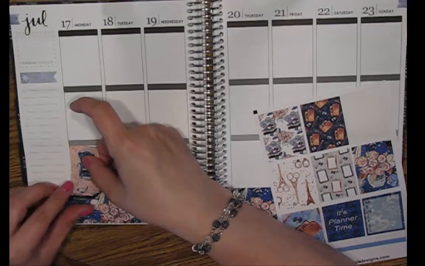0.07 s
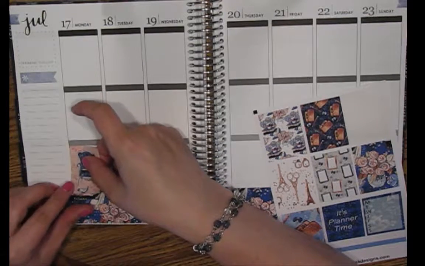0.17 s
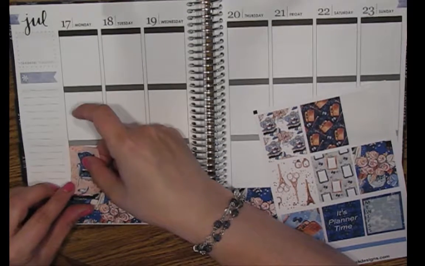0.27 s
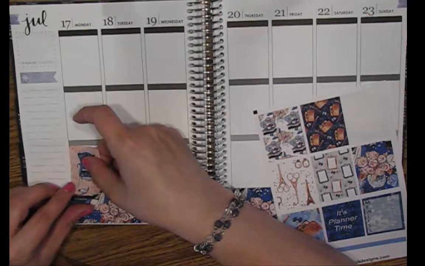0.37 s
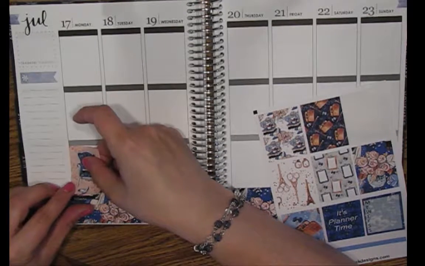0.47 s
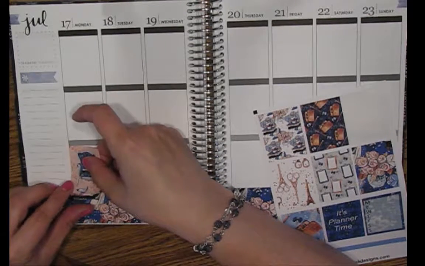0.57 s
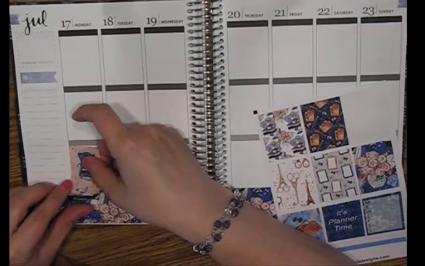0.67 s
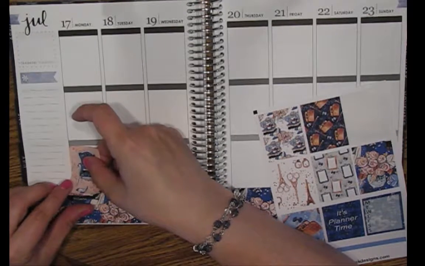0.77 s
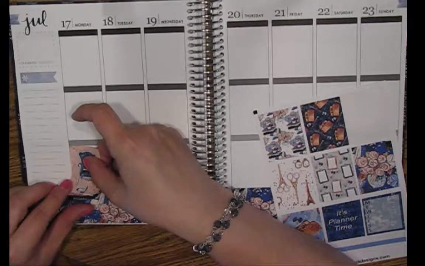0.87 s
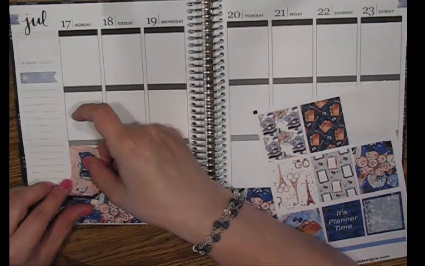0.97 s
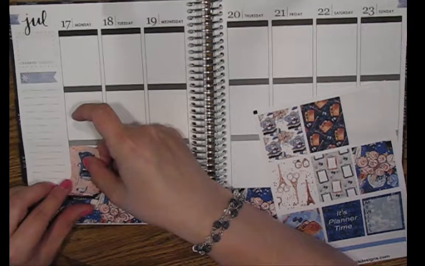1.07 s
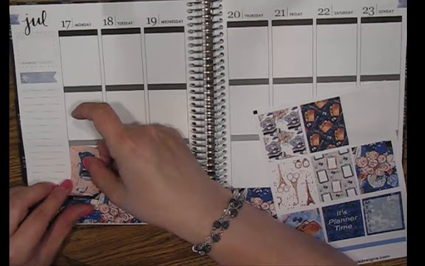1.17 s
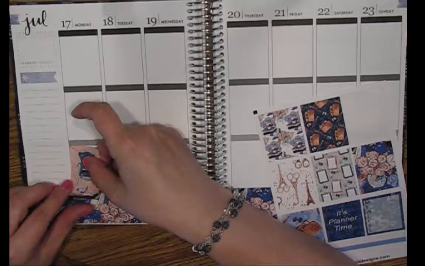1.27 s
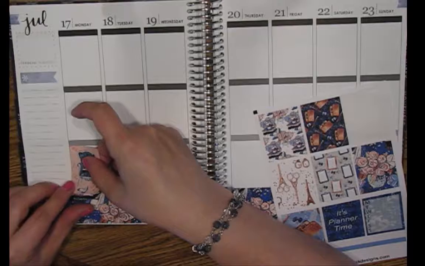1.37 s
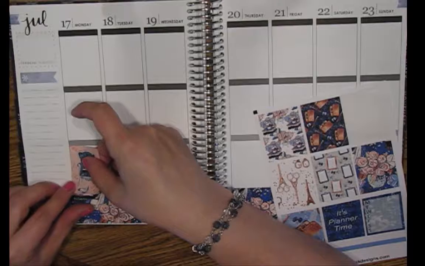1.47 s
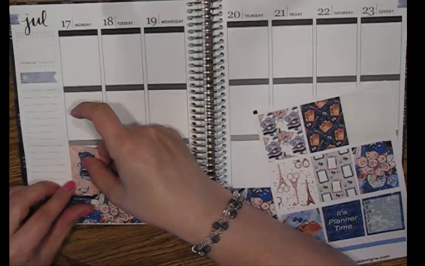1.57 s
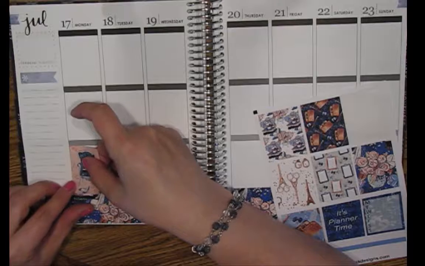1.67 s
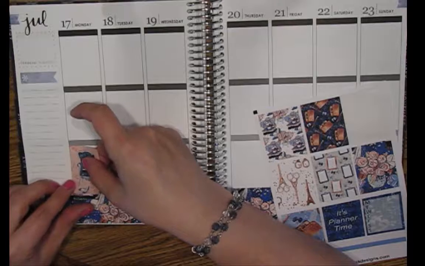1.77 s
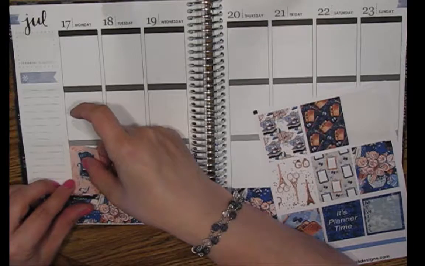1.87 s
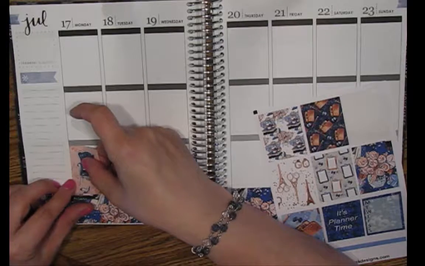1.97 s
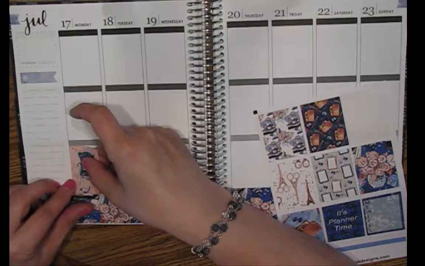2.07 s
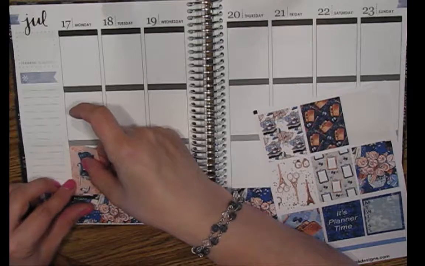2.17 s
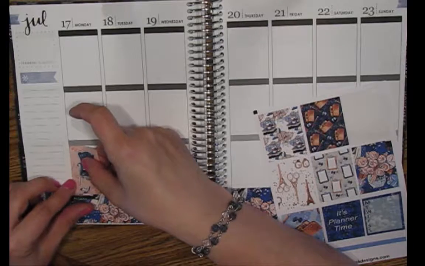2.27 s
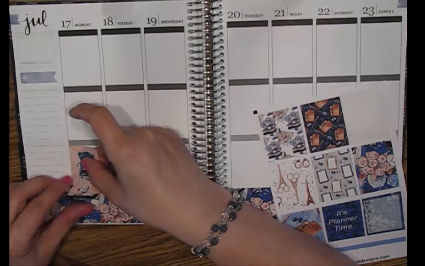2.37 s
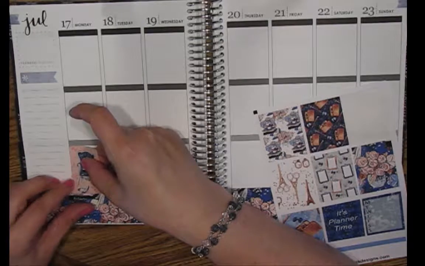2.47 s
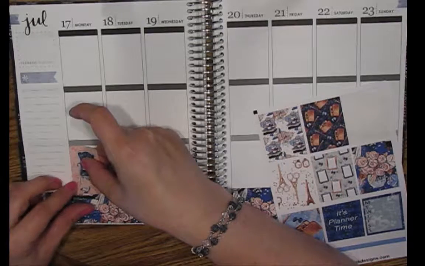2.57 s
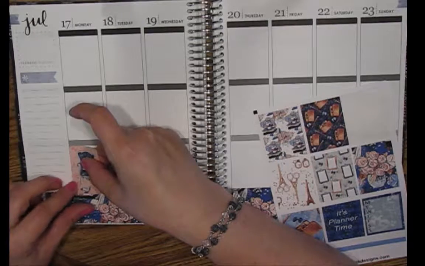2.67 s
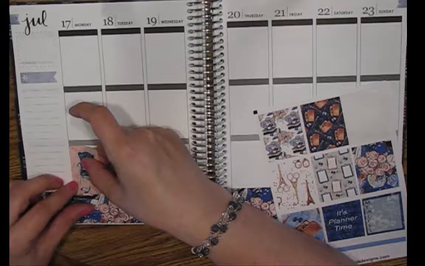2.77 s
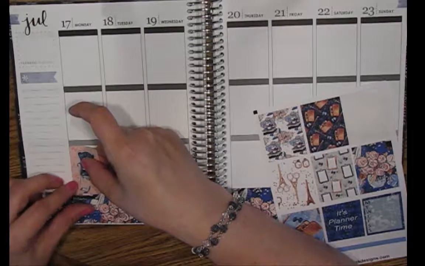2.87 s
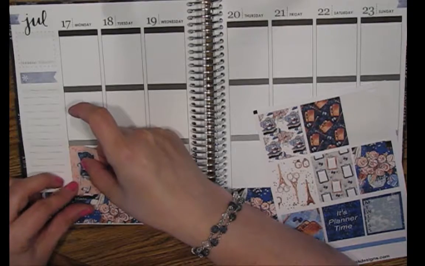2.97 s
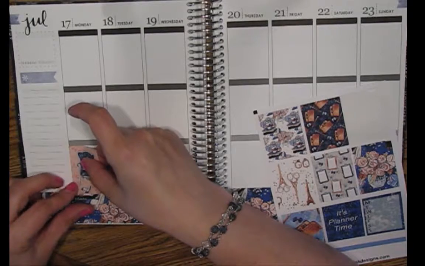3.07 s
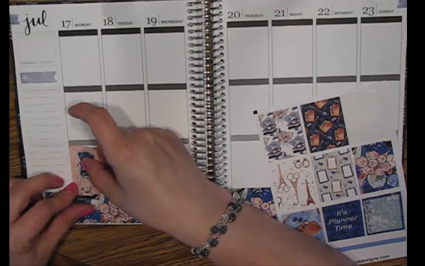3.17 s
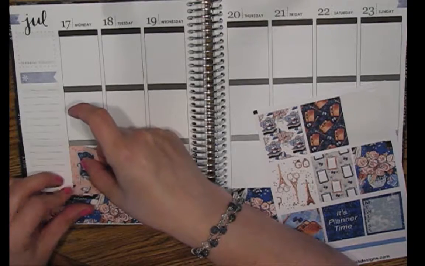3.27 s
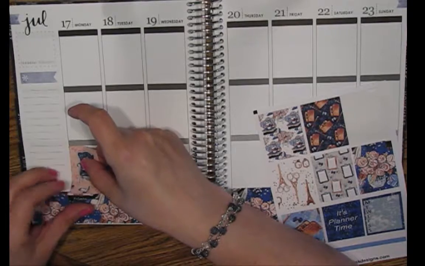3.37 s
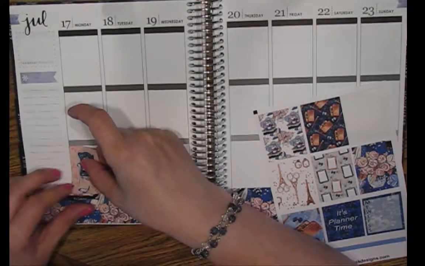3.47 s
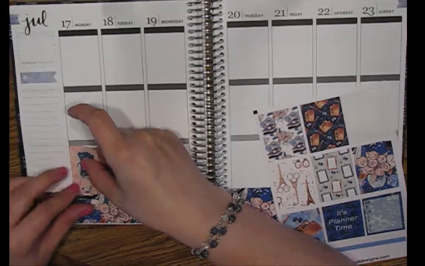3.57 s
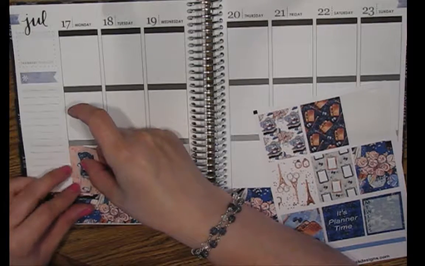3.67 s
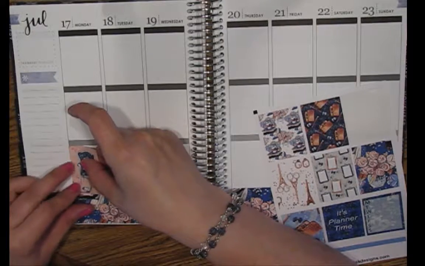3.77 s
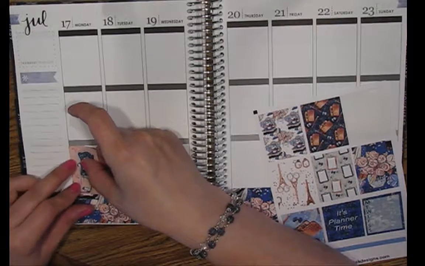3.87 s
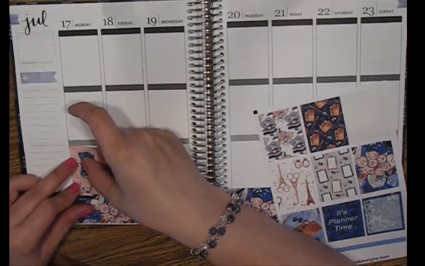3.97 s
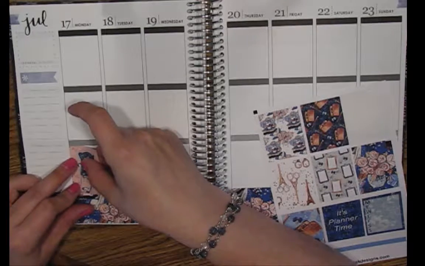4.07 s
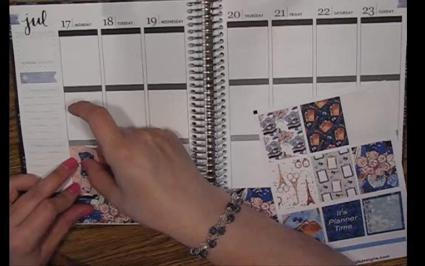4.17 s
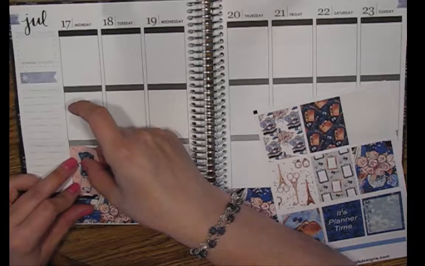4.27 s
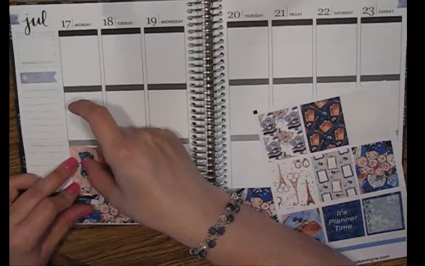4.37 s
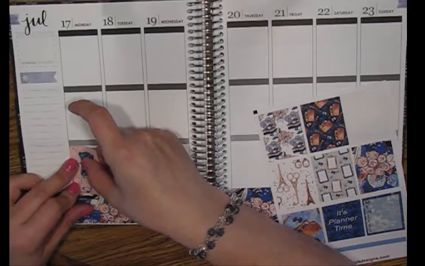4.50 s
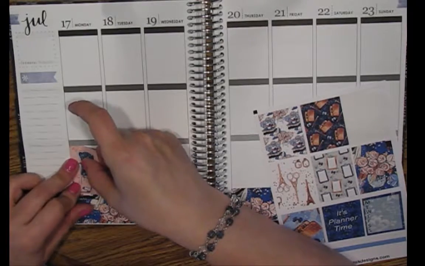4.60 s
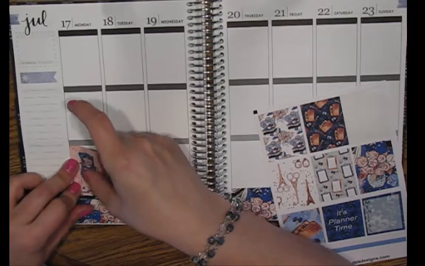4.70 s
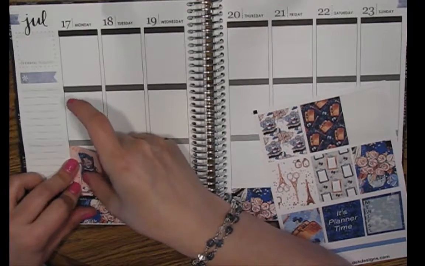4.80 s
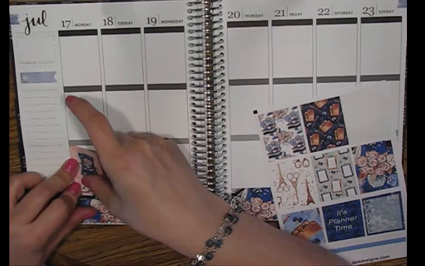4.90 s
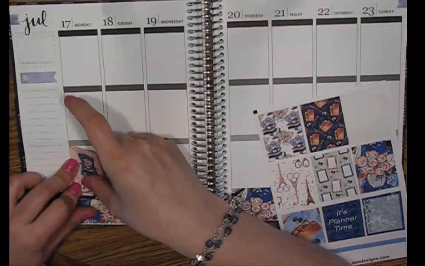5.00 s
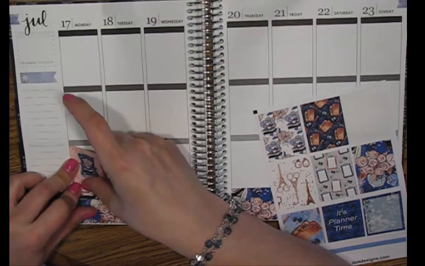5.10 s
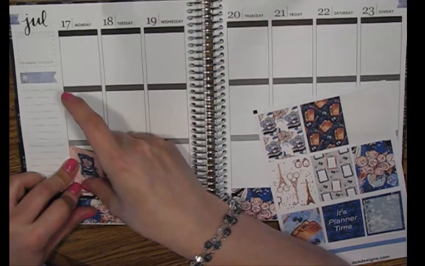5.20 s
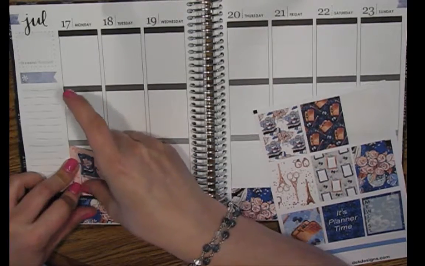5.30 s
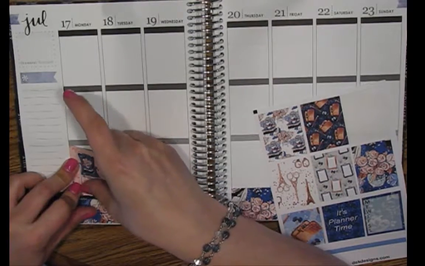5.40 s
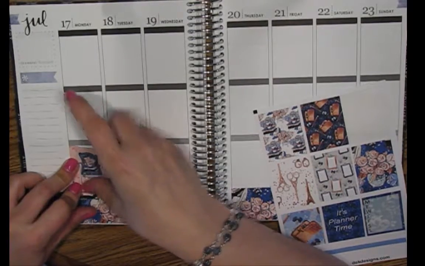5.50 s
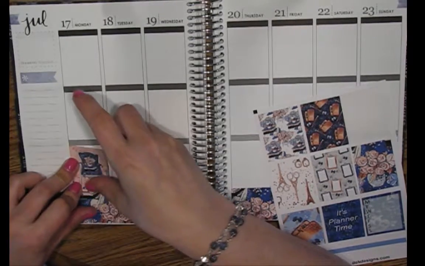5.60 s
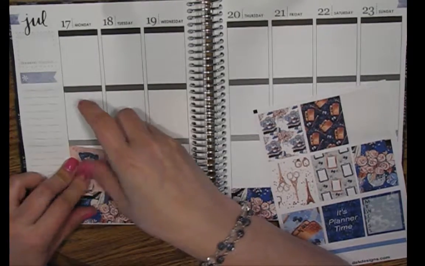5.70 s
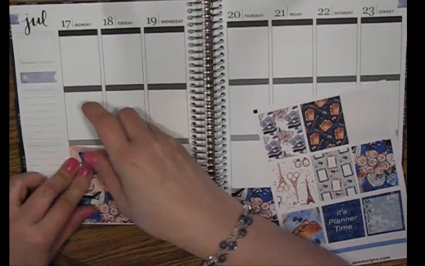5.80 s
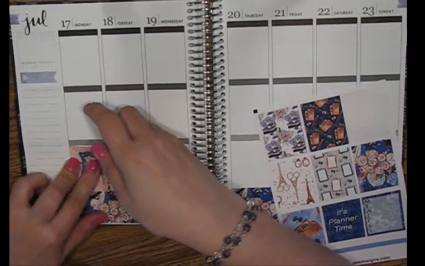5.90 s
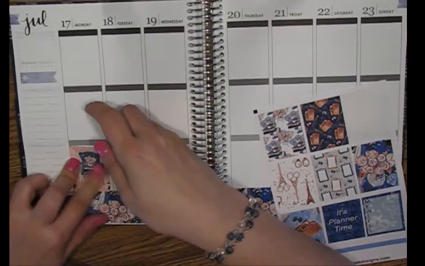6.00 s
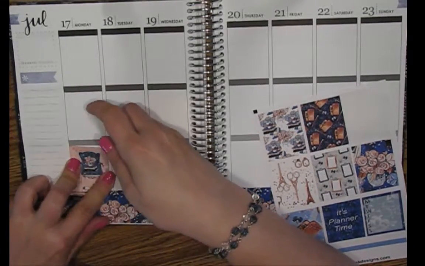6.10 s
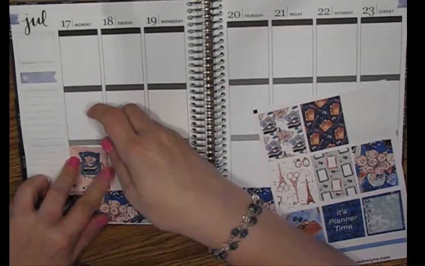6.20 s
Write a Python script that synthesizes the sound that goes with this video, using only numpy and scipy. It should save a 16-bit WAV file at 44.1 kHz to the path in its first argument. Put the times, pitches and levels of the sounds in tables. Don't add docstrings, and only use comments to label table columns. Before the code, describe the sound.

A close, quiet indoor scene over about six seconds. Throughout, a steady low mains motor hum sits under soft air rumble, a faint hollow duct whistle swelling in quick irregular puffs, and thin microphone hiss. A tiny skin scuff opens the sound, then almost nothing but the bed until about 2.5, when light ticks and a soft rub appear, with a sharper glue tick at 2.9. Around 3.5 a small cluster of crisp ticks comes with a short hiss, followed by faint slips near 3.8 and 4.0. From 4.8 fingertips rub more firmly, with sticky ticks and dull nail taps, the strongest at 5.35. At about 5.67 the stiff sheet buckles in one very loud, bright snap, with a small low notebook thud and a short room tail. Rubbing continues with two crisp ticks near 5.86 and more brushing and ticks around 6.2.

```python
import sys
import numpy as np
from scipy import signal
from scipy.fft import rfft, irfft
from scipy.io import wavfile

SR = 44100
rng = np.random.default_rng(int(sys.argv[2]) if len(sys.argv) > 2 else 0)


def volts_from_decibels(level):
    exponent = np.asarray(level, float) / 20
    return 10 ** exponent


def dump(signal):
    limited = np.clip(np.atleast_2d(signal).T, -1, 1)
    pcm = np.round(limited * 32767).astype(np.int16)
    wavfile.write(sys.argv[1], SR, pcm)


N = 275492

# freq_hz, density_db [dB per Hz]
AIR_COLOUR = [(20, -9), (45, -11.5), (75, -6), (95, 1.5), (150, 1.5), (260, 1.5), (300, -8.5), (450, -7.5),
              (800, -14.5), (1000, -14), (1150, -21.5), (2000, -30), (4000, -36), (9000, -50.5)]
# freq_hz, width_hz, level_db [rms]
DUCT_TONES = [(204, 27, -70.5), (349.8, 42, -57), (497.4, 19.3, -57), (609.3, 17, -66.5),
              (669.8, 16, -66.5), (753.5, 37, -67), (1017.7, 21, -68.5)]
# centre_s, peak_db, length_s
PUFFS = [(0.216, -56, 0.054), (0.396, -51.5, 0.055), (0.58, -51.5, 0.05), (0.787, -52.5, 0.071),
         (1.006, -50.5, 0.045), (1.192, -51, 0.051), (1.458, -50, 0.05), (1.707, -52, .1),
         (1.826, -55, .07), (2.038, -62, 0.027), (2.16, -47, 0.011), (2.35, -54.5, 0.11),
         (2.584, -45.5, 0.025), (2.723, -56, 0.21), (2.903, -47, 0.033), (3.09, -52, 0.092),
         (3.282, -47.5, 0.029), (3.44, -49.5, .05), (3.758, -58, 0.059), (3.997, -53, 0.08),
         (4.253, -56, 0.046), (4.452, -52, 0.11), (4.704, -56, .08), (4.885, -44.5, 0.029),
         (5.072, -48, 0.03), (5.21, -53.5, 0.08), (5.442, -46.5, 0.013), (5.525, -48.5, 0.085),
         (5.934, -50, 0.072), (6.087, -50, 0.03)]
# freq_hz, density_db [dB per Hz]
HISS_COLOUR = [(1500, -26.5), (3000, -8), (5000, 1.5), (6500, 1.5), (7500, 7), (8500, 1.5), (9500, -1.5),
               (12000, -5.5), (14000, -7), (15300, -22), (16200, -42)]
# peak_s, level_db, build_up_s, dying_t60_s
SLIPS = [(0.001, -55.5, 0.0013, 0.026), (0.09, -73, .3, .05), (0.36, -74.5, .02, 0.71),
         (0.88, -75, .02, .8), (0.97, -78, .02, .6), (1.46, -75, .02, 1.0), (1.92, -75, .04, 1.0),
         (2.518, -64, 0.18, 0.34), (2.66, -61, 0.016, 0.32), (2.91, -71, .02, 2.3),
         (3.4, -68.5, 0.035, 0.22), (3.48, -60, 0.031, 0.072), (3.516, -66.5, .15, .9),
         (3.67, -72, .1, 0.5), (3.79, -64.5, 0.042, 0.12), (4.0, -65, 0.16, 0.73), (4.585, -74, 0.18, 0.72),
         (4.832, -55, .02, 0.19), (4.93, -55.5, 0.28, .3), (5.0, -60.5, 0.12, 1.8),
         (5.284, -54, 0.012, 0.1), (5.34, -62.5, 0.041, 0.16), (5.452, -56.5, .06, 0.28),
         (5.56, -52, 0.018, 0.091), (5.645, -59, 0.094, 0.82), (5.82, -54, 0.6, 1.5), (6.02, -72, .2, 2.5),
         (6.158, -52.5, 0.014, 0.083), (6.213, -55, 0.17, 0.1), (6.245, -51.5, 0.16, .3)]
# freq_hz, density_db [dB per Hz]
RUB_COLOUR = [(900, -7), (1900, -9), (2800, -14.5), (3900, -5.5), (5000, -5.5), (5900, -5.5), (7400, 0),
              (8600, -6.5), (9300, -15.5), (10800, -21), (12700, -40), (14500, -53), (15800, -23),
              (17000, -31)]
# start_s, peak_db, centre_hz, top_octave_db [relative to the peak]
TICKS = [(2.5216, -42.5, 4300, -24), (2.6594, -51, 4470, -21.5), (2.6744, -46.5, 6550, -20),
         (2.9007, -34.5, 4730, -35), (3.3994, -64, 7820, -20), (3.4421, -55, 7100, -18),
         (3.479, -35.5, 6700, -25), (3.485, -44, 5200, -26), (3.508, -43, 7140, -20),
         (3.516, -38, 6900, -28), (3.5195, -45, 4500, -26), (3.7873, -59, 7800, -18),
         (4.0033, -46.5, 7360, -24), (4.653, -57, 7500, -22), (4.7787, -53, 4090, -9),
         (4.8268, -43, 5140, -14.5), (4.9237, -38, 7260, -23), (4.9544, -53, 7300, -20),
         (5.0014, -53, 7160, -18), (5.2794, -36, 7900, -20), (5.3344, -54, 3510, -27),
         (5.445, -41, 5200, -20), (5.5606, -37.5, 8100, -12), (5.6446, -44, 4960, -21.5),
         (5.853, -32.5, 6820, -30), (5.8665, -31, 6800, -20), (5.9667, -41, 7000, -24.5),
         (6.157, -43, 7260, -14), (6.2158, -35.5, 4600, -11), (6.2454, -42, 4300, -12)]
# freq_hz, density_db [dB per Hz]
GLUE_COLOUR = [(1500, -12), (3000, 5), (3800, -5.5), (5000, 6.5), (6000, -19), (7400, 2), (8600, -9),
               (9500, -21), (12000, -42), (16000, -64)]
# freq_hz, gain_db
ROOM_COLOUR = [(2000, 0.0), (4000, -6.5), (6000, -3.5), (8000, -6), (9000, -19), (11000, -19),
               (13000, 1), (15000, -2.0)]
# start_s, peak_db, centre_hz, edge_share [share of the sharp edge, 0-1]
TAPS = [
    (4.9376, -43.5, 1900, 0.6),
    (4.9548, -52, 1910, 0.2),
    (5.0014, -48, 1500, 0.5),
    (5.2478, -55, 2770, 0.6),
    (5.2777, -46, 1352, 0.13),
    (5.3492, -34, 1240, 0.11),
    (5.4829, -42, 1340, 0.33),
]
# delay_s, level_db
ECHOES = [(0, 0), (.0016, -8), (.0029, -5), (.0046, -11), (.0094, -14), (.0124, -15), (.0169, -16)]
# freq_hz, width_hz, level_db
SHEET_MODES = [(3420, 190, -8.5), (4100, 190, 2), (4830, 228, -2.5), (4960, 150, -2), (5180, 340, -5),
               (6530, 220, 3), (7260, 380, -1), (8100, 270, 6)]
# freq_hz, density_db [dB per Hz]
SNAP_COLOUR = [(1000, -36), (1800, -28.5), (2900, -33), (3350, -10.5), (4000, -4), (4800, -3), (6100, -8),
               (7300, -8.5), (8600, -15), (9100, -25), (10500, -50), (12200, -40), (14500, -39),
               (16500, -64)]
# freq_hz, level_db, t60_s
NOTEBOOK_MODES = [(482, 5, 0.079), (626, 4.5, 0.036), (733, 7.5, 0.094), (875, 1.5, 0.097),
                  (1890, -17, 0.03)]

SNAP_S, SNAP_DB = 5.6736, -5.0


def rms_one(x):
    return x / np.sqrt(np.mean(x ** 2) + 1e-20)


def white(length):
    return rng.standard_normal(length)


def colour(x, points):
    size = 4096
    hz, db = np.transpose(points)
    bin_hz = np.arange(size // 2 + 1) * SR / size
    log_gain = np.log(volts_from_decibels(np.interp(np.log(bin_hz + 1), np.log(hz), db)))
    cepstrum = irfft(log_gain, size)
    cepstrum[1:size // 2] *= 2
    cepstrum[size // 2 + 1:] = 0
    impulse = irfft(np.exp(rfft(cepstrum)), size)
    return signal.fftconvolve(x, impulse)[:len(x)]


def resonance(x, hz, width_hz):
    r = np.exp(-np.pi * width_hz / SR)
    zeros = [(1 - r * r) / 2, 0, (r * r - 1) / 2]
    poles = [1, -2 * r * np.cos(2 * np.pi * hz / SR), r * r]
    return signal.lfilter(zeros, poles, x)


def drift(rate_hz):
    slow = signal.butter(2, rate_hz, fs=SR, output="sos")
    return rms_one(signal.sosfilt(slow, white(N + SR))[SR:])


def add(track, s, sound, peak_db):
    start = round(s * SR)
    piece = sound[:N - start]
    track[start:start + len(piece)] += volts_from_decibels(peak_db) * piece / np.max(np.abs(sound))


def burst(noise, t60_s):
    t = np.arange(len(noise)) / SR
    return noise * volts_from_decibels(-60 * t / max(t60_s, 1e-3))


def sudden_break(noise, t60_s):
    edge = 0.6 * burst(noise, t60_s)
    edge[0] = 1
    return edge


def mains_hum():
    t = np.arange(N) / SR
    level = volts_from_decibels(-44.5 + 0.11 * drift(1.1))
    return np.sqrt(2) * level * np.sin(2 * np.pi * 120.0 * t)


def duct_air():
    air = volts_from_decibels(-48.5) * rms_one(colour(white(N + 4096), AIR_COLOUR)[4096:])
    for hz, width_hz, db in DUCT_TONES:
        pole_width_hz = 1.37 * width_hz
        once = resonance(white(N + SR), hz, pole_width_hz)
        twice = resonance(once, hz, pole_width_hz)
        air += volts_from_decibels(db) * rms_one(twice[SR:])
    return air


def whistle():
    t = np.arange(N) / SR
    swell = volts_from_decibels(-72.5)
    for s, db, length_s in PUFFS:
        swell = swell + volts_from_decibels(db) * np.exp(-((t - s) / length_s) ** 2)
    pitch_hz = 483.7 + 6.994 * drift(8.55)
    return np.sqrt(2) * swell * np.cos(2 * np.pi * np.cumsum(pitch_hz) / SR)


def microphone_hiss():
    return volts_from_decibels(-77) * rms_one(colour(white(N), HISS_COLOUR))


def rub():
    scuff_hz, scuff_width_hz = 5160, 660
    t = np.arange(N) / SR
    body_gain, top_gain, scuff_gain = np.zeros(N), np.zeros(N), np.zeros(N)
    for s, db, rise_s, t60_s in SLIPS:
        distance = np.where(t < s, (s - t) / rise_s, (t - s) / t60_s)
        slip = volts_from_decibels(db - 60 * distance)
        body_gain += slip
        scuff_gain += slip * volts_from_decibels(-12.5 + 0.32 * (db + 50))
        top_gain += slip * volts_from_decibels(-22 + 0.2 * (db + 66))
    grain_db = 4.5 * np.minimum(rng.exponential(1, N), 4)
    clump_db = 2.2 * drift(56.0)
    grains = white(N) * volts_from_decibels(grain_db + clump_db)
    body = colour(grains, RUB_COLOUR)
    top = signal.sosfilt(signal.butter(3, [12200, 14300], "band", fs=SR, output="sos"), grains)
    scuff = resonance(grains[::-1], scuff_hz, scuff_width_hz)
    scuff = resonance(scuff, scuff_hz, scuff_width_hz)
    return body_gain * rms_one(body) + top_gain * rms_one(top) + scuff_gain * rms_one(scuff)


def ticks():
    out = np.zeros(N)
    top_band = signal.butter(2, [12000, 15000], "band", fs=SR, output="sos")
    patch_band = signal.butter(5, [3340, 9100], "band", fs=SR, output="sos")
    for s, db, hz, top_db in TICKS:
        noise = white(6000)
        crackle = volts_from_decibels(-29.5) * burst(noise[::-1], 0.022)
        crack = sudden_break(noise, 0.0019) + crackle
        patch = colour(crack, GLUE_COLOUR) + 3.2 * resonance(crack, hz, 540.0)
        add(out, s, signal.sosfilt(patch_band, patch), db)
        add(out, s, signal.sosfilt(top_band, crack), db + top_db)
    return out


def room(x):
    t60_s, rise_s, level_db = 0.51, 0.012, -33.5
    t = np.arange(SR) / SR
    tail = burst(white(SR), t60_s) * (1 - np.exp(-t / rise_s))
    return volts_from_decibels(level_db) * signal.fftconvolve(x, colour(tail, ROOM_COLOUR))[:N]


def taps():
    out = np.zeros(N)
    dull = signal.butter(4, 4500.0, fs=SR, output="sos")
    for s, db, hz, edge_share in TAPS:
        hit = signal.sosfilt(dull, sudden_break(white(1024), 0.0029))
        ring = resonance(hit, hz, 270.0)
        edge = resonance(hit, 2900.0, 2800.0)
        add(out, s, ring + edge_share * edge, db)
    return out


def sheet_snap():
    out, crack = np.zeros(N), np.zeros(2048)
    for delay_s, echo_db in ECHOES:
        add(crack, delay_s, sudden_break(0.5 * white(256), 0.0045), echo_db)
    rung = np.zeros(2048)
    for k, (hz, width_hz, mode_db) in enumerate(SHEET_MODES):
        sign = (-1) ** k
        rung += sign * volts_from_decibels(mode_db) * resonance(crack, hz, width_hz)
    add(out, SNAP_S, colour(crack + 1.57 * rung, SNAP_COLOUR), SNAP_DB)
    return out


def notebook_thud():
    out = np.zeros(N)
    t = np.arange(4096) / SR
    onset = 1 - np.exp(-t / 0.00055)
    for hz, mode_db, t60_s in NOTEBOOK_MODES:
        mode = np.sin(2 * np.pi * hz * t) * volts_from_decibels(-60 * t / t60_s) * onset
        add(out, SNAP_S + 0.0011, mode, SNAP_DB - 37 + mode_db)
    return out


def scene():
    bed = mains_hum() + duct_air() + whistle() + microphone_hiss()
    small = ticks() + taps()
    snap = sheet_snap()
    answer = room(snap + volts_from_decibels(-6) * small)
    mix = bed + rub() + small + snap + notebook_thud() + answer
    return mix[None]


def band_limit(x):
    return signal.sosfilt(signal.butter(12, 15400, fs=SR, output="sos"), x)


def record(dry):
    return band_limit(dry)


dry = scene()
out = record(dry)
dump(out)
```